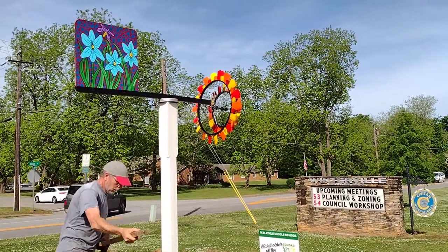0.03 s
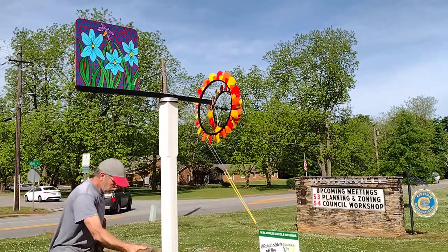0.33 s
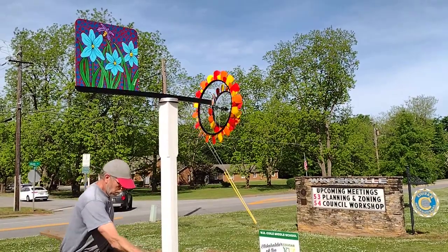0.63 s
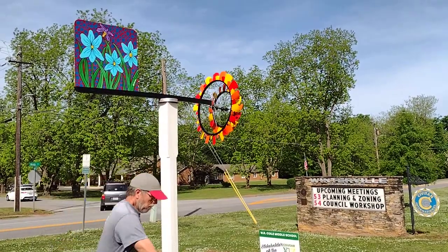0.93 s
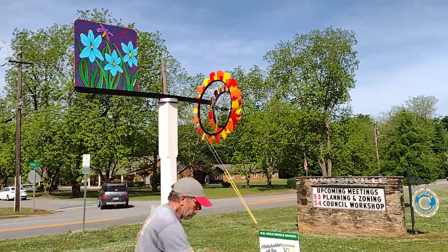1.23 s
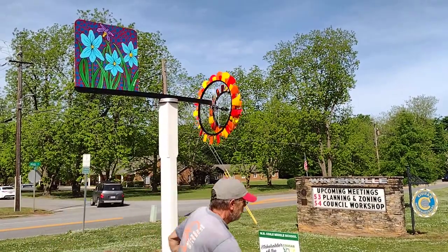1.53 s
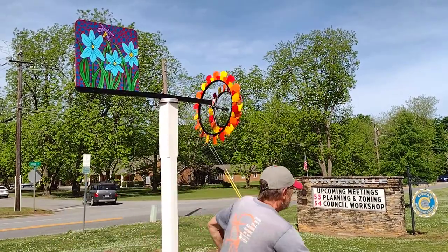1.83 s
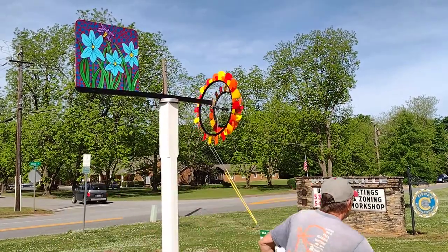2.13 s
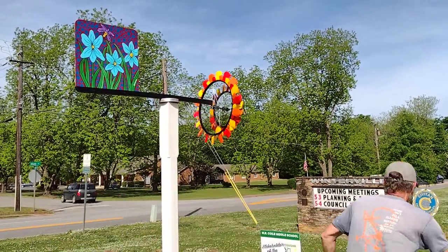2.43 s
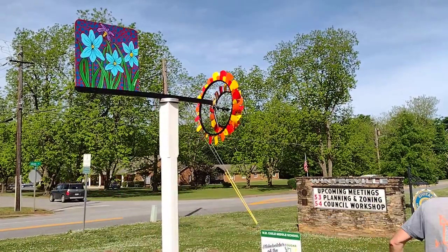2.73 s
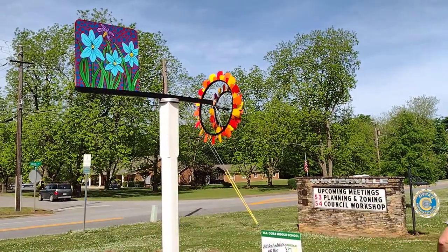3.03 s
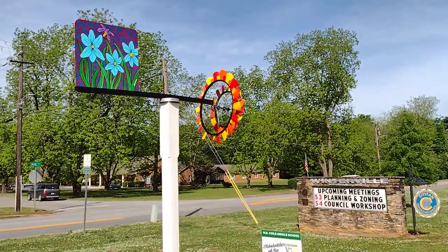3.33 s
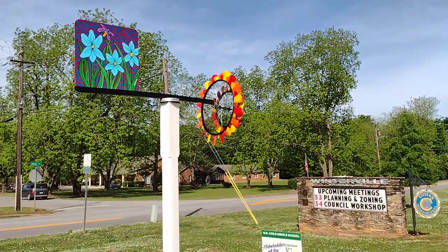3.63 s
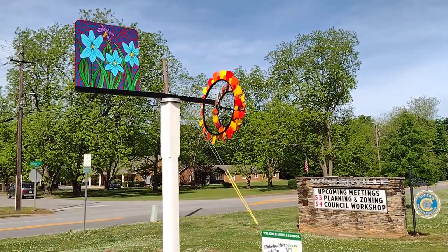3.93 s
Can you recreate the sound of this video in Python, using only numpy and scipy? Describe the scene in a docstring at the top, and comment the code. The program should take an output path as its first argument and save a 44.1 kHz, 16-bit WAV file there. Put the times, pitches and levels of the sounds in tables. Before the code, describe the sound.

Steady tyre roar and low engine rumble from a road, as a breeze buffets the microphone.

```python
"""Light traffic on a road, heard from the lawn beside it through one microphone.
Tyres roar steadily on the asphalt over a low rumble of engines, and one exhaust drones as a car draws away.
A breeze rises and, near the end, throws eddies against the microphone. Behind it all are the far
hiss of road and leaves, a few dry ticks and one faint falling note from a small bird."""
import sys
import numpy as np
from scipy import signal
from scipy.fft import rfft, irfft
from scipy.io import wavfile

SR = 44100
rng = np.random.default_rng(int(sys.argv[2]) if len(sys.argv) > 2 else 0)


def materialize(psi):
    """Save the field psi as 16-bit PCM at rate SR to the path in sys.argv[1].

    A 1-D psi becomes a single channel; in a 2-D psi each row is a channel.
    """
    bounded = np.clip(np.atleast_2d(psi).T, -1, 1)
    quanta = np.round(bounded * 32767).astype(np.int16)
    wavfile.write(sys.argv[1], SR, quanta)


N = 176400


def from_db(db):
    """Decibels to gain."""
    return 10 ** (np.asarray(db) / 20)


def unit_rms(x):
    """Scale to unit rms."""
    return x / np.sqrt(np.mean(x ** 2) + 1e-20)


def fader(rows):
    """Gain over time from rows of time_s, level_db."""
    time_s, level_db = np.transpose(rows)
    return from_db(np.interp(np.arange(N) / SR, time_s, level_db))


def drift(rate_hz):
    """Slow random wander with spread 1."""
    freq_hz = np.arange(N // 2 + 1) * SR / N
    return unit_rms(irfft(rfft(rng.standard_normal(N)) / (1 + (freq_hz / rate_hz) ** 2), N))


def noise(spectrum, flutter_db, flutter_hz):
    """Noise of a given colour whose level flutters; rms 1."""
    points_hz, density_db = np.transpose(spectrum)
    freq_hz = np.maximum(np.arange(N // 2 + 1) * SR / N, 1)
    colour = from_db(np.interp(np.log(freq_hz), np.log(points_hz), density_db))
    colour /= 1 + (freq_hz / points_hz[-1] / 2) ** 4   # rolls off an octave above the last point
    steady = irfft(rfft(rng.standard_normal(N)) * colour, N)
    return unit_rms(steady * from_db(flutter_db * drift(flutter_hz)))


# loudness of the far hiss: time_s, level_db
FAR_HISS_LEVEL = [(0, -69), (.7, -68.5), (1.15, -69), (1.8, -70), (2.3, -67.5), (2.75, -67.5), (3.2, -69.5),
                  (4, -70.5)]
# its spectrum: freq_hz, density_db
FAR_HISS_SPECTRUM = [(2000, -10), (3300, -3.5), (4200, 2.5), (4800, 0), (5600, -3.5), (6600, -8.5),
                     (7700, -10.5)]

def far_hiss():
    """Road and leaves in the distance blend into a thin, high hiss."""
    return fader(FAR_HISS_LEVEL) * noise(FAR_HISS_SPECTRUM, flutter_db=1.03, flutter_hz=7.6)


# faint dry ticks: start_s, level_db
TICKS = [(.63, -68), (.845, -60.5), (1.511, -62), (1.867, -60), (2.006, -64), (2.53, -62), (3.843, -66)]
# their spectrum: freq_hz, density_db
TICK_SPECTRUM = [(2000, -13), (4500, 0.5), (7500, -5)]

def ticks(decay_s=0.0054):
    """Tiny bright snaps in the background that die at once."""
    t = np.arange(N) / SR
    envelope = np.zeros(N)
    for start_s, level_db in TICKS:
        envelope += from_db(level_db) * (t >= start_s) * np.exp(-np.abs(t - start_s) / decay_s)
    return envelope * noise(TICK_SPECTRUM, flutter_db=2, flutter_hz=50)


# the bird's two voices: start_s, length_s, start_pitch_hz, end_pitch_hz, level_db
BIRD_VOICES = [(3.594, .115, 6030, 5800, -71.5), (3.598, .165, 5130, 4590, -71)]

def bird(waver_hz=60, fade_s=.01, echo_db=-9):
    """Two thin whistles slide down together, with scattered echoes from the trees."""
    t, song = np.arange(N) / SR, np.zeros(N)
    for start_s, length_s, start_pitch_hz, end_pitch_hz, level_db in BIRD_VOICES:
        end_s = start_s + length_s
        pitch_hz = np.interp(t, [start_s, end_s], [start_pitch_hz, end_pitch_hz])
        pitch_hz += waver_hz * drift(rate_hz=40)
        gate = np.clip(np.minimum(t - start_s, end_s - t) / fade_s, 0, 1)
        song += from_db(level_db) * gate * np.sin(2 * np.pi * np.cumsum(pitch_hz) / SR)
    echoes = sum(np.interp(t - lag_s, t, song) for lag_s in rng.uniform(0.025, 0.16, size=4))
    return song + from_db(echo_db) * echoes / 2   # four echoes, halved, together sit about 9 dB below the song


def pressure_swing(cycles, width_cycles=.6):
    """A bump of pressure between two troughs."""
    return np.cos(2 * np.pi * cycles) * np.exp(-(cycles / width_cycles) ** 2)


# turbulence at the microphone, ahead of its low cut: time_s, level_db
BREEZE_LEVEL = [(0, -66.5), (2.2, -58), (2.65, -48.5), (3.3, -47), (3.4, -42), (3.48, -49.5), (3.56, -43.5),
                (3.61, -30.5), (3.77, -34.5), (3.87, -41.5), (4, -30)]
# its spectrum: freq_hz, density_db
BREEZE_SPECTRUM = [(15, -24), (35, -8.5), (70, 0.5), (120, -2.5), (180, -12.5), (260, -16.5), (400, -26.5),
                   (800, -60)]
# single eddies, also ahead of the low cut: centre_s, level_db, pitch_hz, core_ratio
EDDIES = [(2.671, -29.5, 123, .05), (2.906, -33, 101, .05), (3.179, -32, 110, .2), (3.203, -32, 128, .05),
          (3.352, -34, 112, 0.045), (3.390, -23, 120, .1), (3.405, -24, 125, 0.017),
          (3.424, -15.5, 106, 0.38), (3.454, -22, 105, .02), (3.540, -13.5, 100, 0.04),
          (3.592, -18, 120, 0.2), (3.61, -18, 135, 0.055), (3.633, -15, 148, 0.043), (3.67, -25.5, 130, .1),
          (3.694, -19, 90, 0.054), (3.720, -24.5, 127, 0.31), (3.753, -17.5, 218, 0.12),
          (3.767, -22.5, 168, .02), (3.786, -23, 129, .02), (3.835, -23.5, 110, .03),
          (3.896, -22.5, 124, .03), (3.951, -24.5, 135, .03), (3.974, -21, 102, .05),
          (3.987, -26.5, 130, .03)]

def wind_on_microphone(core_speedup=2.6, low_cut_hz=49):
    """Each eddy hits the microphone as a pressure swing with a sharper core, over lumpy turbulence."""
    t, bumps = np.arange(N) / SR, np.zeros(N)
    for centre_s, level_db, pitch_hz, core_ratio in EDDIES:
        passing = np.abs(t - centre_s) < .05
        cycles = (t[passing] - centre_s) * pitch_hz
        core = core_ratio * pressure_swing(cycles * core_speedup)
        bumps[passing] += from_db(level_db) * (pressure_swing(cycles) + core)
    turbulence = fader(BREEZE_LEVEL) * noise(BREEZE_SPECTRUM, flutter_db=2, flutter_hz=36)
    low_cut = signal.butter(1, low_cut_hz, "high", fs=SR, output="sos")
    return signal.sosfilt(low_cut, bumps + turbulence)


# loudness of one car's exhaust: time_s, level_db
EXHAUST_LEVEL = [(0, -62.5), (1.2, -54), (2.2, -59), (2.55, -50.5), (2.85, -48.5), (3.2, -48.5), (4, -48.5)]
# its spectrum: freq_hz, density_db
EXHAUST_SPECTRUM = [(20, -22.5), (42, -10), (60, -7), (72, 0.5), (84, -4.5), (110, -15.5), (200, -40)]

def exhaust():
    """A car draws away and the deep drone of its exhaust swells."""
    return fader(EXHAUST_LEVEL) * noise(EXHAUST_SPECTRUM, flutter_db=.5, flutter_hz=5)


# engine rumble reaching the lawn: time_s, level_db
ENGINE_LEVEL = [(0, -46), (.45, -47), (.8, -48.5), (1.55, -46.5), (2.3, -49), (3.0, -48), (4, -48.5)]
# its spectrum: freq_hz, density_db
ENGINE_SPECTRUM = [(15, -26), (30, -12), (50, -5.5), (75, -0.5), (88, -2.5), (108, -1.5), (135, -0.5),
                   (185, -6), (230, -3.5), (255, -5), (290, -14.5), (400, -24.5), (700, -43)]

def engines():
    """The engines out on the road merge into one low rumble."""
    return fader(ENGINE_LEVEL) * noise(ENGINE_SPECTRUM, flutter_db=1.17, flutter_hz=11)


# tyre roar and upper hiss reaching the lawn: time_s, level_db
TYRE_ROAR_LEVEL = [(0, -48), (.6, -48.5), (1.2, -48), (1.9, -48), (2.3, -47.7), (2.75, -46.5),
                   (3.25, -47.3), (3.65, -45.5), (4, -49)]
TYRE_HISS_LEVEL = [(0.0, -55), (0.56, -55.5), (0.57, -54), (0.93, -57), (1.15, -54.5), (1.91, -58),
                   (2.75, -51.5), (2.93, -55.5), (3.97, -53.5)]
# their spectra: freq_hz, density_db
TYRE_ROAR_SPECTRUM = [(200, -20), (300, -5.5), (380, -4), (470, -6.5), (560, -4.5), (760, -1), (900, -0.5),
                      (1040, -3), (1200, 0), (1370, 0.5), (1600, -4), (1900, -5), (2400, -25.5),
                      (3200, -37)]
TYRE_HISS_SPECTRUM = [(1200, -20.5), (1700, -5), (2000, -1), (2350, -1.5), (2750, -8), (3050, -15),
                      (3400, -22), (4500, -42)]

def tyres():
    """Tyres rolling on the asphalt make a steady roar with a hiss above it."""
    roar = fader(TYRE_ROAR_LEVEL) * noise(TYRE_ROAR_SPECTRUM, flutter_db=0.63, flutter_hz=11)
    hiss = fader(TYRE_HISS_LEVEL) * noise(TYRE_HISS_SPECTRUM, flutter_db=0.23, flutter_hz=11)
    return roar + hiss


def scene():
    """Road, wind, bird and small ticks at one microphone on the lawn."""
    traffic = tyres() + engines() + exhaust()
    return (traffic + far_hiss() + wind_on_microphone() + bird() + ticks())[None]


def record(dry):
    """The recorder cuts the treble steeply."""
    cutoff_hz = 7700
    return signal.sosfilt(signal.cheby1(12, .2, cutoff_hz, fs=SR, output="sos"), dry)


dry = scene()
out = record(dry)
materialize(out)
```